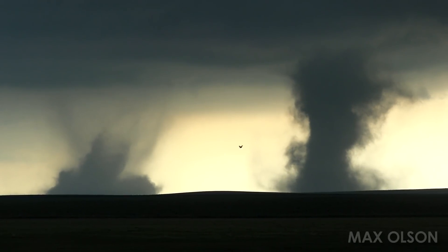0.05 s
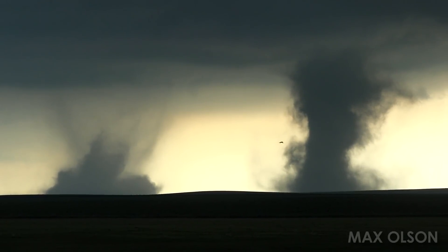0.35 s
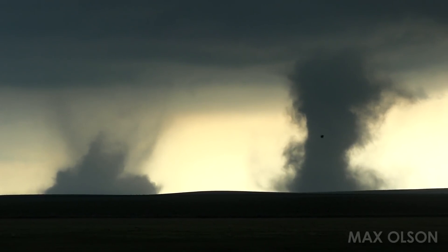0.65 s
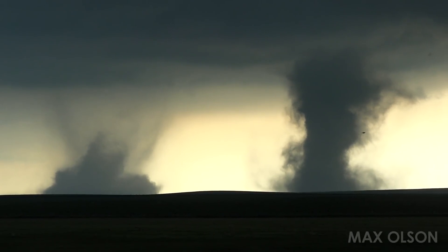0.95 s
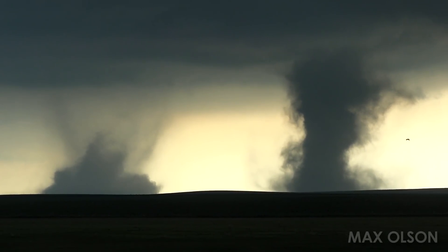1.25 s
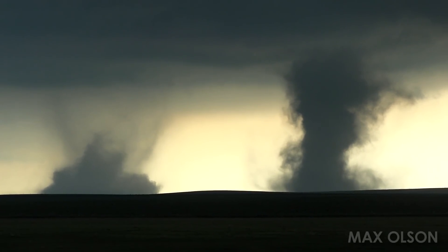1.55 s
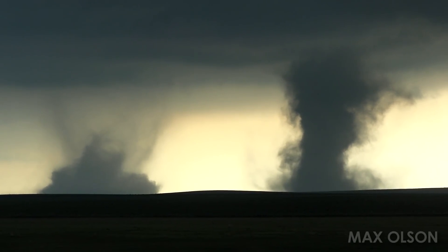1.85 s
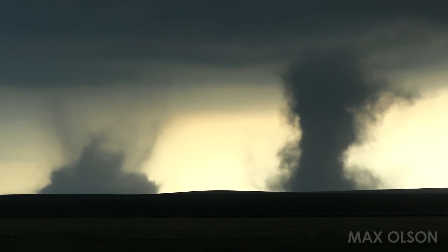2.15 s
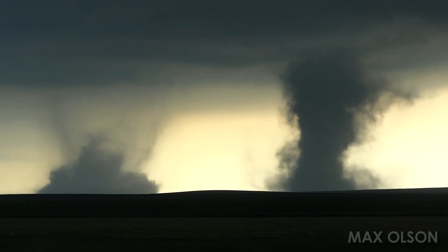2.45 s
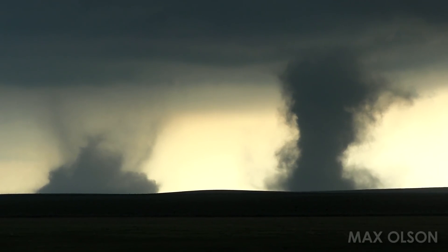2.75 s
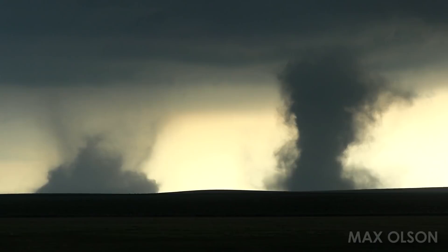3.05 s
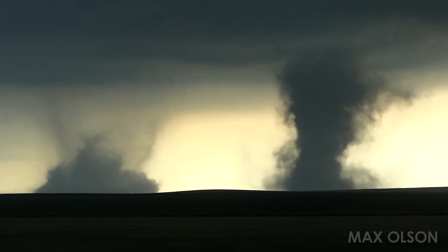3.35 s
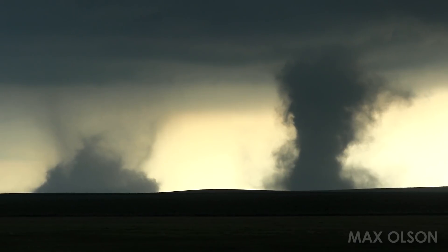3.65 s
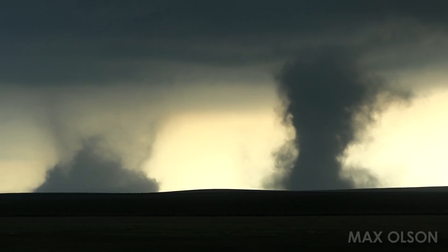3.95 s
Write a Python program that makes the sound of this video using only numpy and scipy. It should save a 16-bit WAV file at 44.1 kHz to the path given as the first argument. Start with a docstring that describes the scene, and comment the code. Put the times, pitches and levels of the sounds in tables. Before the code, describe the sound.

A vehicle rushes past on a wet road, tyres hissing and water spattering down.

```python
"""A vehicle rushes past on a wet road, heard from a parked car whose engine idles.
Its tyres approach with a bright rush and a rough drone, while their spray swells to a hiss.
About a second in they roar alongside, the drone falls in pitch and a hollow roar trails behind.
The water spatters down in fine drops and splats, and a few drops ring with a thin tick.
A low rumble of idle and distant wind remains."""
import sys
import numpy as np
from scipy import signal
from scipy.fft import rfft, irfft
from scipy.io import wavfile

SR = 44100
rng = np.random.default_rng(int(sys.argv[2]) if len(sys.argv) > 2 else 0)


def transcribe(u):
    """Save the signal u as a 16-bit wav file named by the first command-line argument.

    u: samples, shape (n,) or (channels, n), limited to [-1, 1]; the rate is SR.
    q: integer samples, one column per channel.
    """
    v = np.clip(np.atleast_2d(u).T, -1, 1)
    q = np.round(v * 32767).astype(np.int16)
    wavfile.write(sys.argv[1], SR, q)


N = 176400

# engine hum: (multiple of the firing rate, level [dB])
ENGINE_ORDERS = [(1, -57.5), (2, -49.5), (3, -56), (5, -51), (7, -52), (10, -53.5)]
# low bed of wind: (frequency [Hz], relative level [dB])
WIND_EQ = [(20, -7), (42, -9), (70, -1), (190, 1.5), (300, 0.5), (400, -5), (490, -3.5), (680, -6.5),
           (900, -17.5), (1100, -16.5), (1450, -20), (1800, -29), (2400, -32.5), (3050, -30.5),
           (3700, -35.5), (4200, -29.5), (4750, -36), (5200, -33.5), (5800, -41), (8000, -35),
           (10000, -39.5), (13500, -40), (15500, -58)]
# its lean: (frequency [Hz], left minus right [dB])
WIND_PAN = [(55, -2.5), (200, 3), (310, -1), (880, 0.5), (2200, 4), (3500, 0.7)]

# bright rush thrown ahead of the vehicle: (time [s], level [dB])
AHEAD_FADER = [(0, -44), (.3, -38), (.47, -35.5), (.58, -38.5), (.8, -38), (1.1, -58), (4, -87)]
# its colour: (frequency [Hz], relative level [dB])
AHEAD_EQ = [(20, 2), (58, 8.5), (150, 5.5), (700, -10.5), (900, 0.5), (1100, -4.5), (1380, -2),
            (1600, -1.5), (1850, -16), (2250, -15), (2550, -34), (5500, -17), (15000, -29.5)]
# its lean: (frequency [Hz], left minus right [dB])
AHEAD_PAN = [(100, -1), (650, 31), (870, -9), (1100, 9), (1270, 43), (1420, 6), (1600, 15), (1830, -1),
             (3000, -0.5)]
# full tyre roar alongside: (time [s], level [dB])
BESIDE_FADER = [(0, -39.5), (.46, -29), (.61, -29.5), (.73, -24.5), (1.03, -23), (1.13, -28), (1.2, -27),
                (1.3, -31.5), (1.5, -47.5), (2.2, -45.5), (4, -86)]
# its colour: (frequency [Hz], relative level [dB])
BESIDE_EQ = [(20, -32), (58, -0.5), (85, -9.5), (130, -4), (165, -10.5), (215, 0.5), (325, 4), (375, -4.5),
             (470, -1), (640, -1.5), (740, -8.5), (850, -5.5), (930, -10.5), (1050, -11.5), (1400, -19.5),
             (1600, -21), (2000, -24), (3000, -59), (15000, -83)]
# its lean: (frequency [Hz], left minus right [dB])
BESIDE_PAN = [(60, 1), (115, 2), (175, 12), (325, 1.5), (410, 7), (620, 7), (700, 2.5), (880, 5.5),
              (1270, 7.5), (1420, 7), (1600, 5), (1850, 7.5), (3000, -7)]
# hollow roar trailing behind: (time [s], level [dB])
BEHIND_FADER = [(0, -91), (1.1, -39.5), (1.38, -43), (1.48, -36.5), (1.8, -37), (2.1, -47), (2.6, -51.5),
                (4, -75)]
# its colour: (frequency [Hz], relative level [dB])
BEHIND_EQ = [(30, -22), (180, 2.5), (380, -20), (500, -1), (590, -13), (670, 6), (730, -3), (790, -2),
             (880, -2.5), (970, -15), (1400, -19), (2000, -41), (15000, -62)]
# its lean: (frequency [Hz], left minus right [dB])
BEHIND_PAN = [(60, 1), (520, 7.5), (880, 1), (1250, 13.5), (2500, 13)]
# tyre drone: (time [s], upper tone level [dB], lower tone level [dB])
DRONE_FADER = [(0, -43.5, -50.5), (.15, -35, -46), (.5, -36, -42.5), (.72, -29, -48), (.92, -25, -47),
               (1.2, -23, -40.5), (1.37, -32.5, -37.5), (1.43, -43, -37), (1.65, -49.5, -52),
               (2.6, -53.5, -60)]

# hiss of spray off the tyres: (time [s], level [dB])
HISS_FADER = [(0, -57.5), (.2, -57), (.48, -48.5), (.7, -42.5), (.93, -37), (1.04, -39.5), (1.11, -37),
              (1.22, -50), (1.4, -55.5), (4, -88)]
# its colour: (frequency [Hz], relative level [dB])
HISS_EQ = [(200, -26), (1200, -0.5), (2200, 3), (3000, 5), (3800, -1), (5400, 2.5), (6700, -4),
           (7700, -1.5), (10000, -6.5), (14000, -11.5), (16000, -18)]
# its lean: (frequency [Hz], left minus right [dB])
HISS_PAN = [(4000, 0.5), (6000, 2.5), (7200, -2.5), (10300, 3.5), (14000, 1)]
# water falling back: (time [s], level [dB])
PATTER_FADER = [(0, -72), (.9, -62), (1.2, -50.5), (1.35, -54), (1.47, -49), (1.7, -57.5), (1.87, -54),
                (2.18, -57.5), (2.28, -61), (2.7, -65), (4, -70.5)]
# its colour, shared by the splats: (frequency [Hz], relative level [dB])
PATTER_EQ = [(300, -19), (1500, 6), (2150, -3), (2700, 3), (2950, 6.5), (3450, -1.5), (4500, 0), (5500, 2),
             (6250, 1), (7100, -6), (10000, -13), (15000, -26)]
# single splashes: (time [s], level before EQ [dB], decay [s], tilt [dB per octave])
SPLAT_HITS = [(.119, -46, 0.0072, 2), (0.2603, -37.5, 0.0048, 8.5), (.283, -47, 0.0088, 13),
              (0.5696, -34, 0.0092, -0.5), (0.656, -40.5, 0.0091, 8), (1.414, -44, 0.0093, 5),
              (1.434, -43.5, 0.0088, 2), (1.734, -42, 0.0099, 5), (1.753, -42, 0.0095, 5),
              (1.835, -44, .02, 4.5), (1.875, -51, 0.067, 6.5), (1.9665, -46, 0.0059, 6),
              (2.018, -47.5, 0.04, 4.5)]
# ringing drops: (time [s], level [dB])
TICK_HITS = [(1.968, -40.5), (2.02, -55), (2.07, -53.5), (2.13, -57), (2.19, -54), (2.249, -60),
             (2.31, -55.5), (2.38, -54)]

# stereo image of a microphone pair: (frequency [Hz], left-right likeness [0-1], left lead [rad])
STEREO_IMAGE = [(40, .9995, 0), (150, .96, 0), (900, .965, 0), (1350, .93, 0), (2800, .996, 0),
                (4900, .99, 0), (6200, .78, .4), (7300, .42, 1.2), (8300, .38, 2.8), (9400, .18, 3.8),
                (10500, .27, 4.9), (12400, .63, 5.95), (14000, .94, 6.28)]
# cabin resonances: (frequency [Hz], width [Hz], boost [dB])
CABIN_RESONANCES = [(460, 110, 2.5), (859, 24.4, 5), (1018, 71, 6.5), (2455, 230, 2)]

TIME_S, BIN_HZ = np.arange(N) / SR, np.fft.rfftfreq(N, 1 / SR)


def amp(db):
    """Decibels to gain."""
    return 10 ** (np.asarray(db) / 20)


def unit(x):
    """Scales to rms 1."""
    return x / np.sqrt(np.mean(x ** 2) + 1e-20)


def curve(table, column=1):
    """Draws a column across the spectrum, over log frequency."""
    columns = np.transpose(table)
    return np.interp(np.log(BIN_HZ + 1), np.log(columns[0] + 1), columns[column])


def fader(table, column=1):
    """Rides a column of dB over time, as a gain per sample."""
    columns = np.transpose(table)
    return amp(np.interp(TIME_S, columns[0], columns[column]))


def wander(rate_hz):
    """Smooth random movement of rms 1."""
    return unit(irfft(rfft(rng.standard_normal(N)) * np.exp(-(BIN_HZ / rate_hz) ** 2), N))


def stereo(pair, eq, pan=None):
    """Colours two unrelated signals and blends them as two microphones hear one source."""
    left, unrelated = rfft(pair)
    likeness = np.clip(curve(STEREO_IMAGE), 0, 1)
    right = likeness * left + np.sqrt(1 - likeness ** 2) * unrelated
    spectra = np.array([left, right * np.exp(-1j * curve(STEREO_IMAGE, column=2))])
    if pan is not None:
        lean = amp(np.outer([.5, -.5], curve(pan)))
        spectra = spectra * lean / lean.mean(0)
    return irfft(spectra * unit(amp(curve(eq))), N)


def rush(eq, pan, flutter_db, flutter_hz):
    """Turbulent noise with a slight flutter."""
    return stereo(rng.standard_normal((2, N)), eq, pan) * amp(flutter_db * wander(flutter_hz))


def rough_tone(hz, spread_hz, steady):
    """A narrow band of noise spread either side of a pitch; steady 0-1 evens out its beating."""
    beating = wander(spread_hz) + 1j * wander(spread_hz)
    beating = beating / (abs(beating) + 0.28) ** steady
    carrier = np.exp(2j * np.pi * np.cumsum(hz * np.ones(N)) / SR)
    return unit((beating * carrier).real)


def panned(x, left_db):
    """Places a sound left of centre."""
    return x * amp(np.array([[.5], [-.5]]) * left_db)


def engine_idle(firing_hz=26.14, waver=0.00807):
    """The engine hums at multiples of its wavering firing rate, under the tone of a fan."""
    firings = np.cumsum(firing_hz * (1 + waver * wander(rate_hz=4.25))) / SR
    hum = np.zeros(N)
    for order, db in ENGINE_ORDERS:
        swell = amp(db + 2 * wander(rate_hz=2.6))
        hum += swell * np.sqrt(2) * np.sin(2 * np.pi * (order * firings + rng.random()))
    fan = amp(-50.5) * rough_tone(hz=309.5, spread_hz=4.5, steady=0.83)
    return panned(hum, left_db=1.5) + fan


def wind():
    """Distant wind lays a low bed under the scene."""
    return amp(-41) * rush(WIND_EQ, WIND_PAN, flutter_db=1.0, flutter_hz=25)


def tyre_roar():
    """Tyres on the wet road: bright on the approach, full alongside, hollow from behind."""
    ahead = rush(AHEAD_EQ, AHEAD_PAN, flutter_db=1.7, flutter_hz=22) * fader(AHEAD_FADER)
    beside = rush(BESIDE_EQ, BESIDE_PAN, flutter_db=0.5, flutter_hz=35) * fader(BESIDE_FADER)
    behind = rush(BEHIND_EQ, BEHIND_PAN, flutter_db=-0.2, flutter_hz=30) * fader(BEHIND_FADER)
    return ahead + beside + behind


def tyre_drone(upper_hz=245, lower_hz=130.86, doppler=.115, pass_s=1.02, bend_s=.06):
    """Two rough tones take a Doppler dive at the pass; the upper one clears as the vehicle recedes."""
    along = (TIME_S - pass_s) / bend_s
    receding = along / np.hypot(1, along)  # -1 coming, +1 going
    bend = 1 - doppler * receding
    coming = rough_tone(upper_hz * bend, spread_hz=44, steady=0.24) * np.sqrt((1 - receding) / 2)
    going = rough_tone(upper_hz * bend, spread_hz=25, steady=0.41) * np.sqrt((1 + receding) / 2)
    upper = (coming + going) * fader(DRONE_FADER)
    lower = rough_tone(lower_hz * bend, spread_hz=12.25, steady=0.62) * fader(DRONE_FADER, column=2)
    return panned(upper, left_db=5) + panned(lower, left_db=4.5)


def spray(drops_per_s=4400, drop_spread_db=3.5, energy_decay_s=0.0011):
    """Water hisses off the tyres and falls back as fine drops."""
    hiss = rush(HISS_EQ, HISS_PAN, flutter_db=0.8, flutter_hz=35) * fader(HISS_FADER)
    landings = rng.random(N) < drops_per_s / SR
    drops = landings * amp(drop_spread_db * np.minimum(rng.exponential(1, N), 4))
    energy = signal.lfilter([1], [1, -np.exp(-1 / (energy_decay_s * SR))], drops ** 2)
    grains = unit(np.sqrt(abs(energy)) * rng.standard_normal((2, N)))
    patter = stereo(grains, PATTER_EQ) * amp(0.83 * wander(rate_hz=27))
    return hiss + patter * fader(PATTER_FADER)


def splats(attack_s=0.0028):
    """Larger splashes land in short bursts of noise, each with its own brightness."""
    octaves = np.log2((BIN_HZ + 500) / 5000)
    bursts = np.zeros((2, N))
    for start, db, decay_s, tilt_db in SPLAT_HITS:
        age = np.maximum(TIME_S - start, 0)
        envelope = np.minimum(age / attack_s, 1) * np.exp(-np.maximum(age - attack_s, 0) / decay_s)
        noise = irfft(rfft(rng.standard_normal((2, N))) * amp(tilt_db * octaves), N)
        bursts += noise * amp(db) * envelope
    return stereo(bursts, PATTER_EQ)


def drop_ticks(attack_s=0.0017, decay_s=0.0052):
    """A few drops ring one thin note."""
    envelope = np.zeros(N)
    for peak_s, db in TICK_HITS:
        age = TIME_S - peak_s
        attack = np.clip(age / attack_s + 1, 0, 1)
        envelope += amp(db) * attack * np.exp(-np.maximum(age, 0) / decay_s)
    return envelope * rough_tone(hz=2905, spread_hz=60, steady=0.54)


def cabin(x, wet_db=-10.5, decay_s=0.0084, low_cut_hz=1800):
    """The cabin booms at a few pitches; brief reflections off the windows colour the treble."""
    boost_db = sum(db / (1 + (2 * (BIN_HZ - hz) / width) ** 2) for hz, width, db in CABIN_RESONANCES)
    boomy = irfft(rfft(x) * amp(boost_db), N)
    delay_s = np.arange(SR // 12) / SR
    echoes = rng.standard_normal(len(delay_s)) * np.exp(-delay_s / decay_s) * (delay_s > .002)
    echoes = signal.sosfilt(signal.butter(2, low_cut_hz, "high", fs=SR, output="sos"), echoes)
    wet = signal.fftconvolve(boomy, echoes[None] / np.linalg.norm(echoes), axes=1)[:, :N]
    return boomy + amp(wet_db) * wet


def scene():
    """The pass-by over idle and wind, coloured by the cabin; drone and ticks stay dry."""
    return cabin(engine_idle() + wind() + tyre_roar() + spray() + splats()) + tyre_drone() + drop_ticks()


def record(dry):
    """A steep high cut takes the very top off the mix."""
    high_cut = signal.firwin(511, cutoff=15600, window=("kaiser", 9), fs=SR)
    return signal.oaconvolve(dry, high_cut[None], "same")


dry = scene()
out = record(dry)
transcribe(out)
```